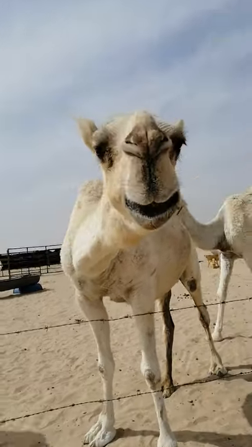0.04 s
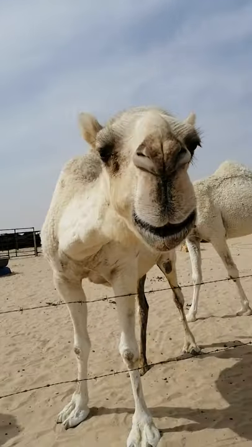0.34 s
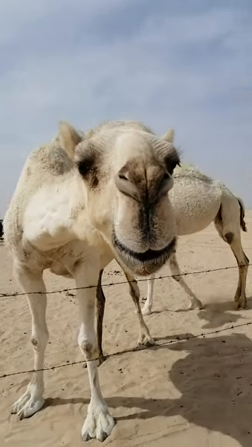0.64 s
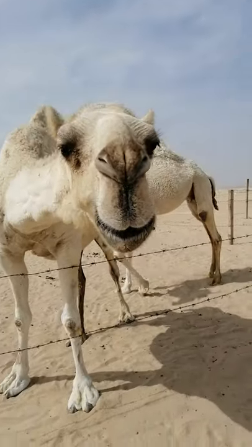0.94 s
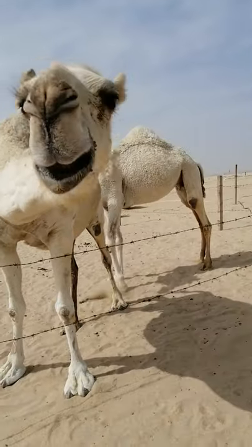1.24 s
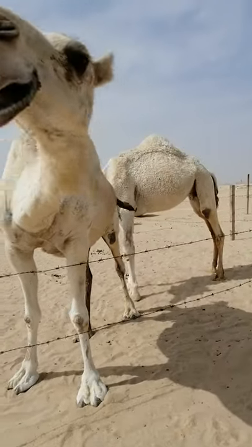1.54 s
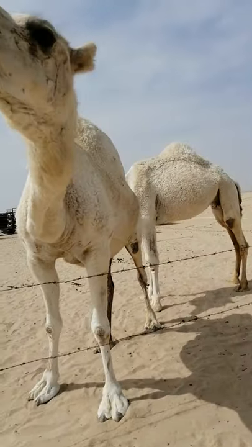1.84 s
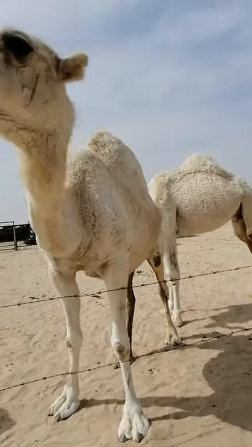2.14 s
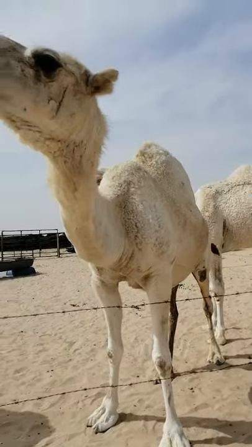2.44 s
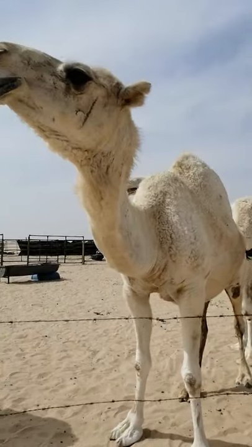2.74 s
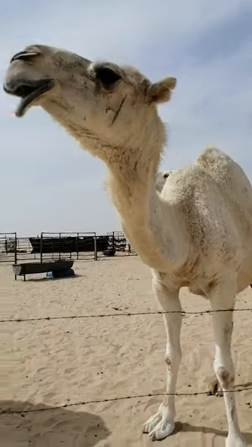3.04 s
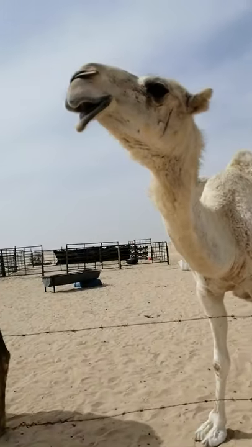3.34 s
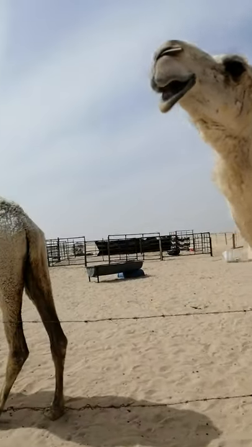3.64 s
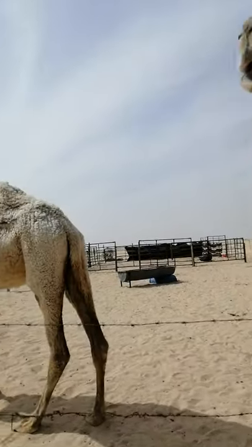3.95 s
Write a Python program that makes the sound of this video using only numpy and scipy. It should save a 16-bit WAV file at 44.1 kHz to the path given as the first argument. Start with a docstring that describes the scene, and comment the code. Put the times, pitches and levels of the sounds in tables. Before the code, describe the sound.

A camel groans close by outdoors, after an opening of only gusty wind rumble and small, dull thumps on the microphone. At about 2 seconds the groan comes in as a low, smooth note, swelling and sinking slightly in pitch. Around 2.8 seconds it breaks into a rough, gurgling rattle that holds until the end at 4 seconds, while the wind keeps buffeting both sides.

```python
"""A camel groans close to a phone in an open, sandy pen: a smooth low note that sags and breaks into
a gurgling rattle at a third of its pitch. Pulses from the larynx (the voice box) ring the long throat,
whose resonances shift as the mouth opens. Gusts rumble and thump on the phone's two microphone
ports (openings), each on its own. Sand hisses faintly over a quiet, steady background."""
import sys
import numpy as np
from scipy import signal
from scipy.fft import rfft, irfft
from scipy.io import wavfile
from scipy.ndimage import uniform_filter1d

SR = 44100
rng = np.random.default_rng(int(sys.argv[2]) if len(sys.argv) > 2 else 0)


def pcm_store(signal):
    """Save signal as 16-bit PCM."""
    levels = np.round(np.clip(np.atleast_2d(signal), -1, 1) * 32767)
    wavfile.write(sys.argv[1], SR, levels.astype(np.int16).T)


N = 176400

# the voice (time [s], mouth opening [0-1], weakening of two pulses in three [0-1], roughness [0-1])
VOICE_QUALITY = [(2.05, 0, 0.1, 0.4), (2.28, 0.06, 0.05, 0.3), (2.38, 0, 0.4, 0.8), (2.5, 0.2, 0, 0.2),
                 (2.66, 0.6, 0.1, 0.4), (2.8, 0.84, 0.2, 0.95), (3.2, 0.9, 0.4, .8), (4, 0.99, 0, .75)]


def camel():
    """Pulses ring the throat and air hisses in the mouth; the sound arrives directly and off the sand."""
    # resonances (frequency [Hz], width [Hz], gain with mouth nearly shut [dB], gain with it open [dB])
    throat_resonances = [(345, 133, 3, 1.5), (536, 125, -1.5, 0.5), (672, 60, -1, -1),
                         (780.3, 94, -0.5, -3.5), (957, 130, -16, -10), (1206.7, 67, -5, -11.5),
                         (1352.4, 70, -9, -12.5), (1689, 100, -16.5, -13), (1828, 85, -19.5, -9.5),
                         (1954, 76, -22.5, -26.5), (2114, 120, -28.5, -23), (2307, 62, -25, -21),
                         (2450, 110, -17.5, -29), (2630, 110, -21, -36.5)]
    mouth_resonances = [(3273, 580, 4, 0.5), (3620, 94, -5.5, 1.5), (4370, 470, -4.5, -6.5),
                        (4960, 470, -3.5, 3.5), (5700, 440, -1.5, 1), (7130, 700, 5, 3.5),
                        (8070, 160, -7.5, 2), (8640, 220, -1.5, -4.5), (10500, 6000, -13, -19)]
    # loudness of the groan, the throat's deep hum and the air in the mouth (time [s], level [dB])
    groan_levels = [(1.8, -89.5), (1.93, -51.5), (2.1, -39), (2.33, -33), (2.41, -40), (2.6, -30.5),
                    (2.82, -32.5), (3.08, -36.5), (3.35, -34), (3.72, -36.5), (4, -35)]
    hum_levels = [(1.8, -110), (2.0, -37), (2.15, -37.5), (2.24, -24.5), (2.42, -27), (2.5, -25),
                  (2.68, -22), (2.8, -35.5), (4, -34.5)]
    hiss_levels = [(2.0, -100), (2.3, -66.5), (2.42, -68.5), (2.68, -60), (2.82, -62.5), (2.91, -60),
                   (3.11, -69.5), (3.33, -58.5), (3.43, -67.5), (3.55, -67), (3.73, -63.5), (3.86, -69.5),
                   (4, -57)]
    buzz, air = larynx()
    groan = cavity(buzz, throat_resonances, drift=0.004, sway_db=1.4) * undb(curve(groan_levels))
    hum = unit(ring(buzz, hz=223, width_hz=42)) * undb(curve(hum_levels))
    hiss = cavity(air, mouth_resonances, drift=0.012, sway_db=4) * undb(curve(hiss_levels))
    voice = pan(-2) * (groan + hum) + pan(-5) * (hiss + squeaks())
    direct_delays_s, bounce_delays_s, bounce_db = (0.00009, 0), (0.0033, 0.007), -6  # pairs: left, right
    t = np.arange(N) / SR
    return np.array([np.interp(t - direct, t, side) + undb(bounce_db) * np.interp(t - bounce, t, side)
                     for side, direct, bounce in zip(voice, direct_delays_s, bounce_delays_s)])


def larynx():
    """Uneven pulses, two in three weaker, each with a puff of air; when rough, the flow gurgles."""
    # the sagging note (time [s], pitch [Hz])
    pitches = [(1.9, 122.5), (2.06, 118.9), (2.15, 115.3), (2.28, 114), (2.51, 111.7), (2.63, 108.8),
               (2.82, 105.9), (3.15, 104.6), (3.55, 105.1), (4, 103.6)]
    jitter_cycles, shimmer_db, rasp_db, gurgle_db = 0.017, 2.5, 2, 2  # at full roughness
    hz = curve(pitches)
    weak, rough = curve(VOICE_QUALITY, column=2), curve(VOICE_QUALITY, column=3)
    cycles = np.cumsum(hz) / SR
    count = np.arange(1, int(cycles[-1]) - 1)
    time_error, size_error = rng.standard_normal((len(count), 2)).T
    due = np.searchsorted(cycles, count)
    when = np.interp(count + jitter_cycles * rough[due] * time_error, cycles, np.arange(N))
    size = 1 - weak[due] * (count % 3 > 0)  # every third pulse stands out: the rattle
    size *= undb(shimmer_db * rough[due] * size_error)
    size /= np.sqrt(1 + 2 * (1 - weak[due]) ** 2)  # weakening does not change the overall power
    pulses, i = np.zeros(N), when.astype(int)
    pulses[i], pulses[i + 1] = size * (1 - when + i), size * (when - i)  # shared between two samples
    puffs = signal.lfilter([1], [1, -np.exp(-hz.mean() / SR)], pulses)  # each fades in about a cycle
    air = unit(puffs * rng.standard_normal(N))
    gurgle = undb(gurgle_db * rough * wander(per_s=45))
    return gurgle * (unit(pulses) + undb(rasp_db) * rough * air), gurgle * air


def cavity(source, resonances, drift, sway_db):
    """Each resonance changes strength as the mouth opens and drifts slightly in pitch."""
    opening, out = curve(VOICE_QUALITY), 0
    for hz, width_hz, shut_db, open_db in resonances:
        # its strength wavers separately on left and right
        sway = sway_db * np.array([wander(per_s=5), wander(per_s=5)])
        ringing = ring(source, hz * (1 + drift * wander(per_s=5)), width_hz)
        out = out + undb(shut_db + (open_db - shut_db) * opening + sway) * ringing
    return unit(out)


def squeaks():
    """Brief, thin, falling tones in the throat, with many overtones."""
    # each squeak (start [s], length [s], starting pitch [Hz], level [dB])
    events = [(2.652, 0.046, 439, -69.5), (2.923, 0.15, 395.5, -66)]
    # the band they sound in (frequency [Hz], gain [dB])
    band = [(2300, -31), (3100, -0.5), (5200, 3), (6500, -22)]
    out, fall_per_s = np.zeros(N), 1
    for start, length, hz, db in events:
        t = np.arange(int(length * SR)) / SR
        phase = 2 * np.pi * np.cumsum(hz * np.exp(-fall_per_s * t)) / SR
        harmonics = sum(np.sin(k * phase + rng.uniform(0, 2 * np.pi)) for k in range(1, 20))
        tone, i = np.zeros(N), int(start * SR)
        tone[i:i + len(t)] = np.sin(np.pi * t / length) * harmonics
        out += unit(colour(tone, band)) * np.sqrt(len(t) / N) * undb(db)
    return out


def wind(gusts):
    """Wind rumbles on one port; small swirls add a flutter that grows faster than the gust, to a limit."""
    # tone of the rumble and of the flutter (frequency [Hz], gain [dB])
    rumble_spectrum = [(15, -17), (30, -1.5), (65, -3), (130, -2.5), (230, -9.5), (400, -21.5),
                       (700, -55.5), (1500, -72.5)]
    flutter_spectrum = [(80, -19.5), (220, 4), (400, -2.5), (650, -10), (1000, -25.5), (1500, -40.5),
                        (2500, -58), (5000, -82)]
    swell_db, swirl_db, lull_below_db, flutter_growth = 1.5, 7.5, -22, 2.08
    gust_db = curve(gusts)
    excess_db = gust_db - lull_below_db
    swirls = wander(per_s=81.05)
    rumble = unit(noise(rumble_spectrum) * undb(swell_db * swirls)) * undb(gust_db)
    choppy_air = rng.standard_normal(N) * undb(swirl_db * np.clip(swirls, -2, 2))
    flutter = unit(colour(choppy_air, flutter_spectrum))
    low = signal.sosfiltfilt(signal.butter(2, 970, fs=SR, output="sos"), flutter)
    flutter = low + (flutter - low) * undb(np.minimum(excess_db, 0))  # duller in the lulls
    flutter_db = -30 + flutter_growth * np.minimum(excess_db, 2)
    return rumble + flutter * undb(flutter_db)


def thumps(size=8192):
    """A large swirl of wind gives a port one pressure kick, rounded or sharp, and a short, dull wake."""
    # each thump (time [s], port [0 left, 1 right], peak of the kick [dB], brightness [Hz])
    events = [(0.018, 0, -6, 334), (.061, 0, -12.5, 252), (.204, 0, -11, 195), (0.236, 0, -14.5, 177),
              (0.26, 0, -7, 195), (.366, 1, -11.5, 415), (0.456, 0, -12.5, 227), (.689, 1, -16.5, 116),
              (0.806, 1, -24, 158), (0.916, 1, -11.5, 637), (0.974, 1, -7, 214), (1.045, 1, -6, 127),
              (1.452, 1, -4, 60), (1.459, 1, -13, 970), (1.651, 1, -12, 101), (1.677, 0, -8, 172),
              (1.836, 0, -7, 183), (1.912, 1, -9.5, 383), (2.003, 0, -8.5, 203), (2.05, 1, -5.5, 194),
              (2.41, 0, -13, 120), (2.968, 0, -7.5, 197.9), (3.011, 1, -7.5, 319.3), (3.062, 1, -14.5, 480),
              (3.226, 0, -6.5, 221.6), (3.411, 1, -6, 240.8), (3.43, 0, -7, 288.6), (3.456, 0, -2, 329.5),
              (3.469, 1, -9, 300), (3.569, 0, -5, 190), (3.67, 1, -3.5, 347.5), (3.75, 0, -7, 258.5)]
    bass_cut_hz, wake_hz, wake_db, rise_s, fade_s = 131, 230, -31.5, 0.0087, 0.011
    out = np.zeros((2, N + 2 * size))
    t = (np.arange(size) - size // 2) / SR
    f = np.arange(size // 2 + 1) * SR / size
    kick = 1.0 * (t == 0)
    wake_shape = np.exp(-np.abs(t) / np.where(t > 0, fade_s, rise_s))
    for time, port, db, hz in events:
        wake = undb(wake_db) * rng.standard_normal(size) * wake_shape
        i = int(time * SR) + size // 2
        for push, top_hz in ((kick, hz), (wake, min(hz, np.sqrt(hz * wake_hz)))):
            band = np.exp(-f / top_hz) * 1j * f / (bass_cut_hz + 1j * f)
            out[port, i:i + size] -= undb(db) * irfft(rfft(push) * band) / np.abs(irfft(band)).max()
    return out[:, size:size + N]


def sand():
    """Sand makes faint, grainy hisses that swell and stop."""
    # each hiss (start [s], length [s], level of the body [dB], treble over the body [dB])
    events = [(0.556, 0.085, -69.5, -2.5), (1.044, 0.47, -88.5, 12.5)]
    # tone of the body and of the treble (frequency [Hz], gain [dB])
    body_spectrum = [(700, -12), (1300, 12), (2600, 1.5), (4000, -1), (12000, -24.5)]
    treble_spectrum = [(3000, -23.5), (5500, -6), (7300, 1.5), (10000, -6), (15000, -11.5)]
    body, treble = noise(body_spectrum), noise(treble_spectrum)
    out = np.zeros(N)
    for start, length, db, treble_db in events:
        progress = np.clip((np.arange(N) / SR - start) / length, 0, 1)
        swell = np.sqrt(np.abs(np.sin(np.pi * progress)))
        out += undb(db) * swell * (body + undb(treble_db) * treble)
    graininess = undb(2 * wander(per_s=220))
    return pan(-12) * out * graininess


def background():
    """The quiet of the desert: a very faint, steady noise."""
    # its tone (frequency [Hz], gain [dB])
    spectrum = [(700, -1), (1500, -13.5), (4000, -19.5), (6000, -16), (7200, -12.5), (9000, -22.5),
                (15000, -29)]
    return undb(-71.5) * noise(spectrum)


def undb(db):
    """Turn decibels into a gain to multiply by."""
    return 10 ** (np.asarray(db) / 20)


def curve(rows, column=1):
    """One column of a timed table, joined by straight lines."""
    rows = np.array(rows, float)
    return np.interp(np.arange(N) / SR, rows[:, 0], rows[:, column])


def unit(x):
    """Scale to an average power of 1."""
    return x / np.sqrt(np.mean(x ** 2))


def colour(x, points):
    """Shape the tone by (frequency [Hz], gain [dB]) points, fading out above the last one."""
    hz, db = np.array(points, float).T
    f = np.maximum(np.arange(N // 2 + 1) * SR / N, 1)
    gain = undb(np.interp(np.log(f), np.log(hz), db)) / (1 + (f / hz[-1] / 2) ** 4)
    return irfft(rfft(x) * gain, N)


def noise(points):
    """Noise with the given tone and a power of 1."""
    return unit(colour(rng.standard_normal(N), points))


def wander(per_s):
    """Glide between random values, typically about 1 either side of zero."""
    step = int(SR / per_s)
    values = np.repeat(rng.standard_normal(N // step + 1), step)
    return unit(uniform_filter1d(values, step)[:N])


def ring(x, hz, width_hz):
    """A resonance: it passes only a band around a frequency that may move."""
    turn = np.exp(2j * np.pi * np.cumsum(hz * np.ones(N)) / SR)
    lowpass = signal.butter(3, width_hz / 2, fs=SR, output="sos")
    return 2 * np.real(signal.sosfilt(lowpass, x * turn.conj()) * turn)  # shift to 0 Hz, filter, shift back


def pan(db):
    """Left and right gains that differ by db; negative leans right."""
    return undb(np.array([[db], [-db]]) / 2)


def scene():
    """The camel, wind on both ports, sand and the quiet background."""
    # wind strength on each port (time [s], level [dB])
    left_gusts = [(0, -23.5), (.21, -26), (.46, -21.5), (.54, -37), (.82, -29.5), (.9, -47), (1.15, -29.5),
                  (1.68, -32), (1.75, -25), (2.01, -17), (2.09, -26), (2.4, -20), (2.5, -32.5),
                  (2.6, -37.5), (2.71, -21), (2.93, -20), (3.01, -18.5), (3.29, -14), (3.34, -29),
                  (3.4, -17.5), (3.68, -24), (3.74, -19), (4, -23.5)]
    right_gusts = [(0, -27.5), (0.152, -20.5), (.25, -31), (.36, -23.5), (.46, -34.5), (.63, -28.5),
                   (.82, -47), (.89, -18.5), (1.04, -25), (1.17, -25), (1.321, -26), (1.45, -19.5),
                   (1.539, -27), (1.65, -15.5), (1.74, -32), (1.91, -18), (2.3, -24), (2.591, -25.5),
                   (2.71, -24), (3.069, -17.5), (3.14, -26.5), (3.44, -21.5), (3.62, -23), (3.791, -24),
                   (4, -19.5)]
    open_air = np.array([wind(gusts) + background() for gusts in (left_gusts, right_gusts)])
    return camel() + open_air + thumps() + sand()


def record(dry):
    """The phone cuts the highest treble."""
    top_hz = 15600
    return signal.sosfilt(signal.ellip(8, 0.2, 70, top_hz, fs=SR, output="sos"), dry)


dry = scene()
out = record(dry)
pcm_store(out)
```